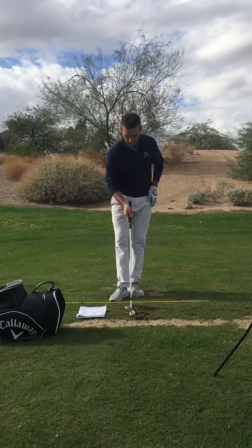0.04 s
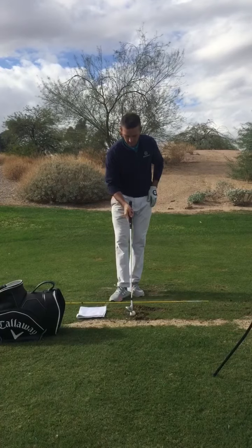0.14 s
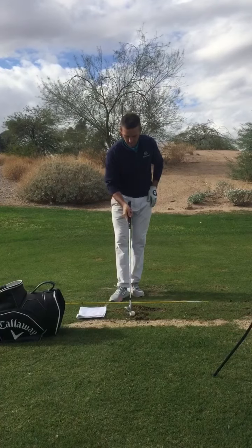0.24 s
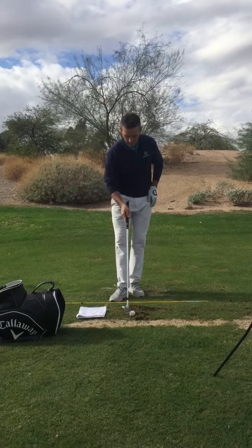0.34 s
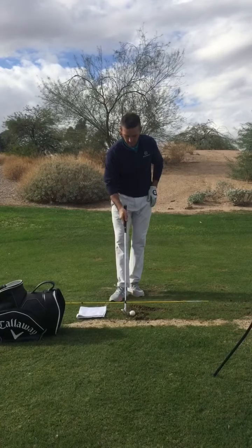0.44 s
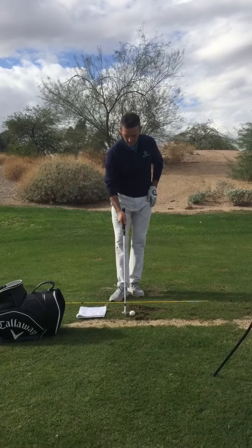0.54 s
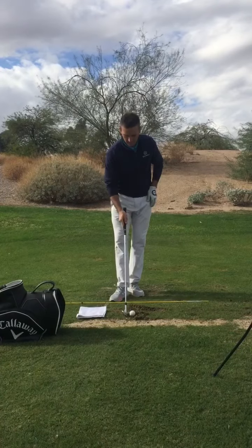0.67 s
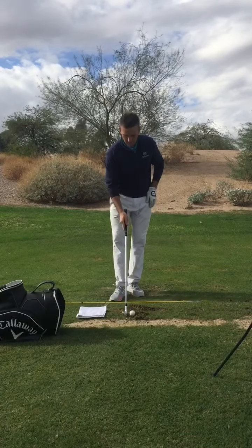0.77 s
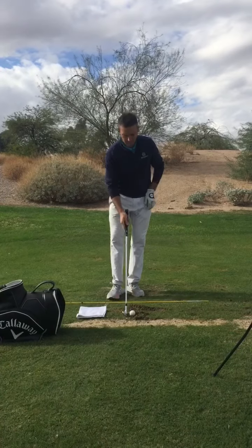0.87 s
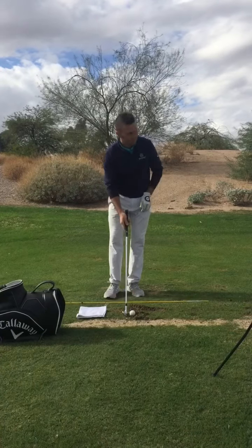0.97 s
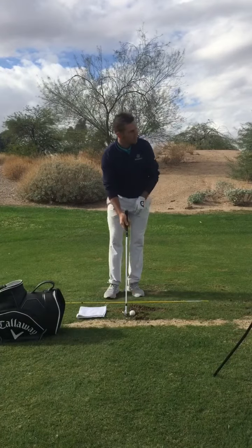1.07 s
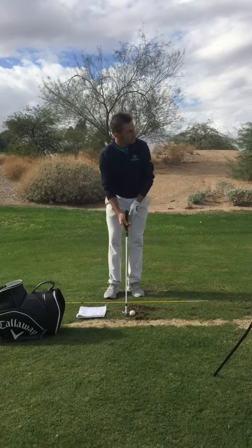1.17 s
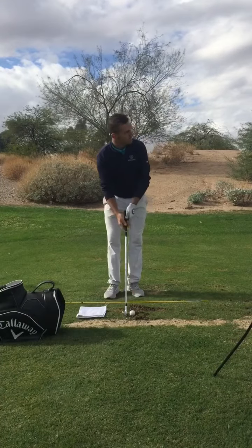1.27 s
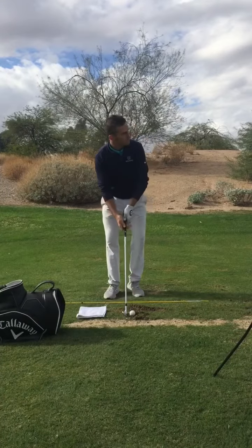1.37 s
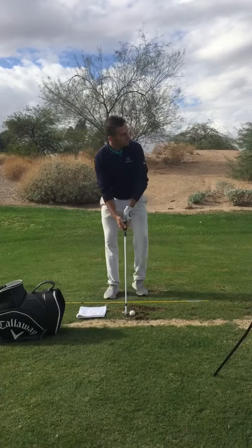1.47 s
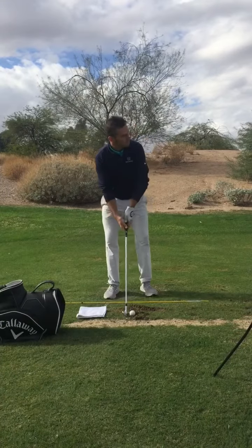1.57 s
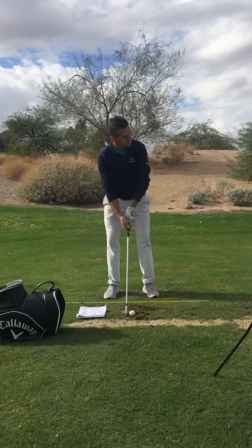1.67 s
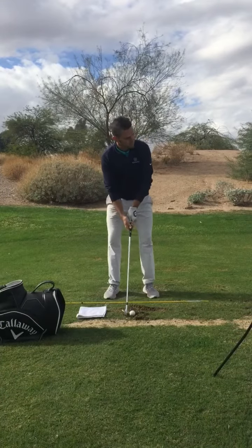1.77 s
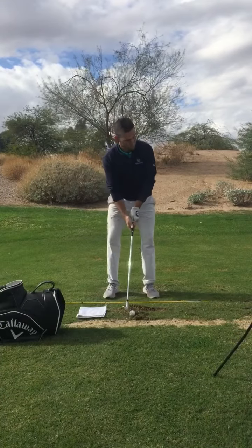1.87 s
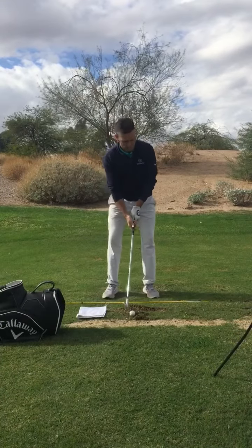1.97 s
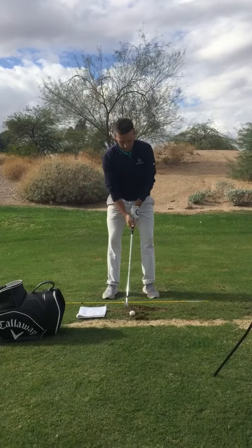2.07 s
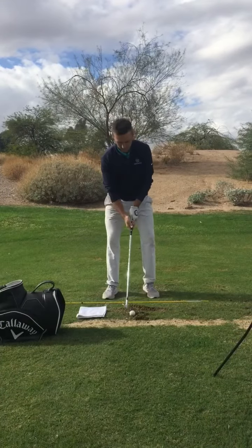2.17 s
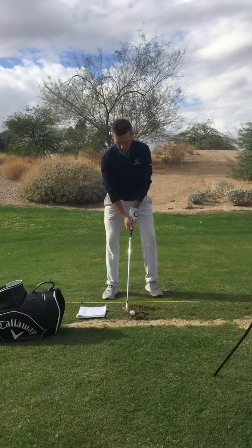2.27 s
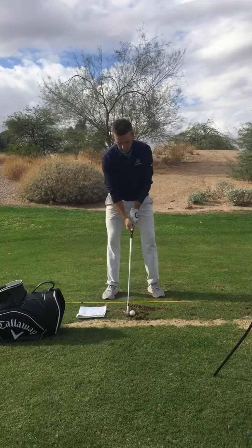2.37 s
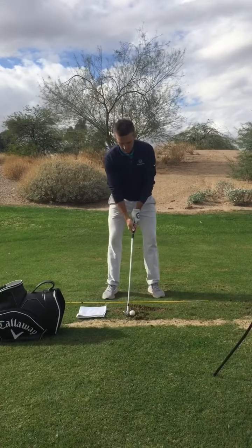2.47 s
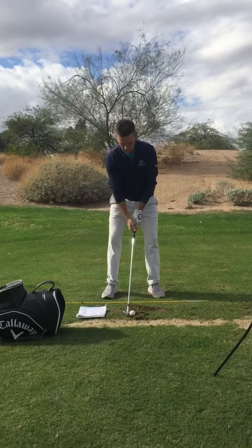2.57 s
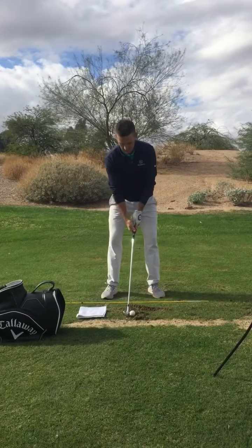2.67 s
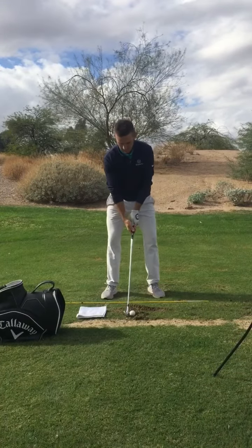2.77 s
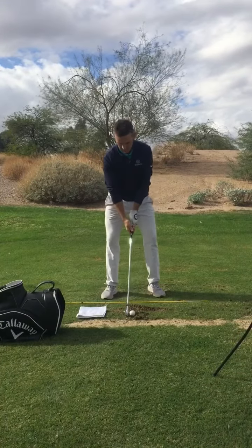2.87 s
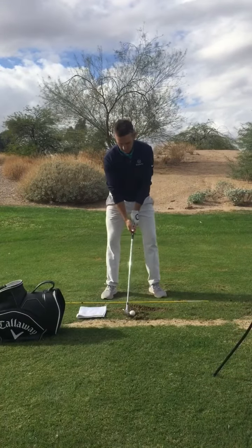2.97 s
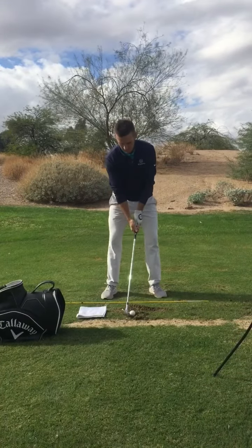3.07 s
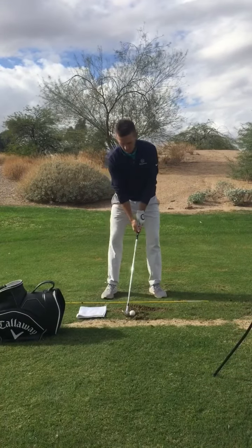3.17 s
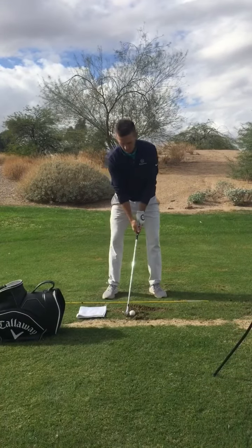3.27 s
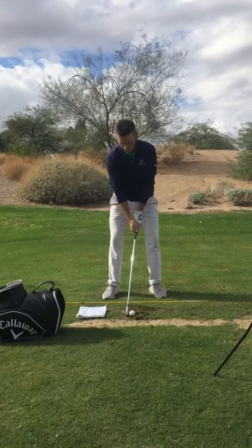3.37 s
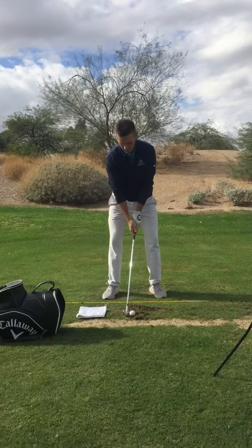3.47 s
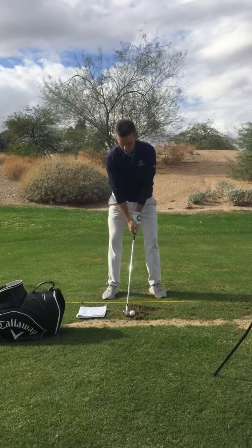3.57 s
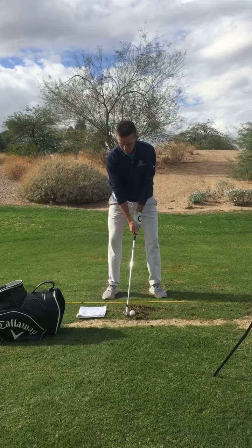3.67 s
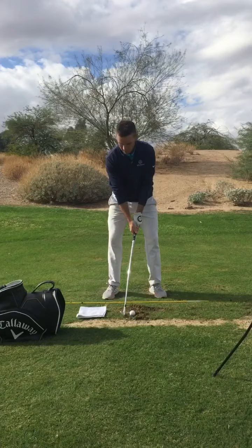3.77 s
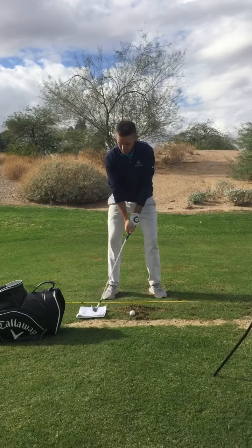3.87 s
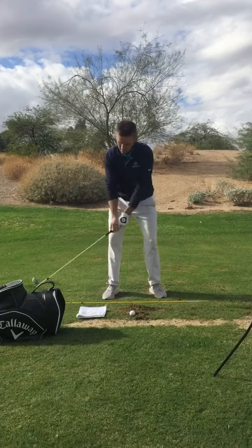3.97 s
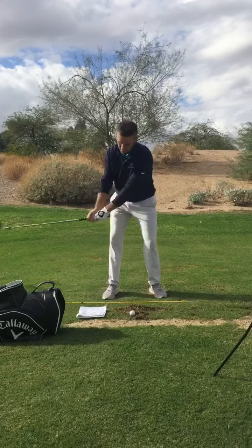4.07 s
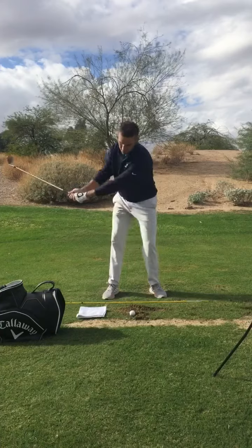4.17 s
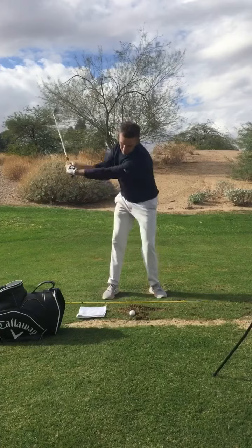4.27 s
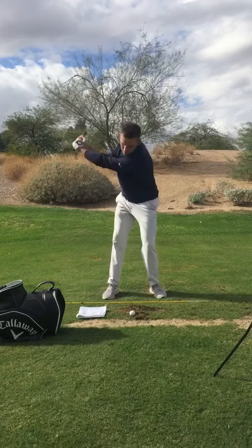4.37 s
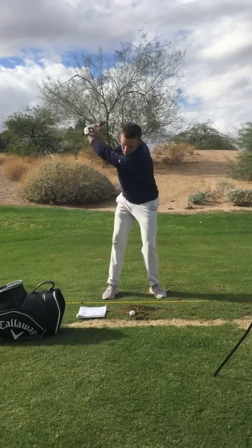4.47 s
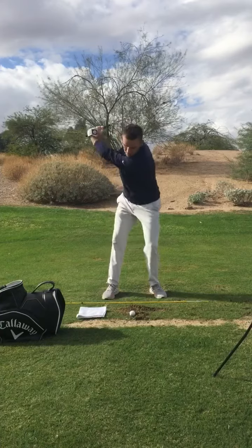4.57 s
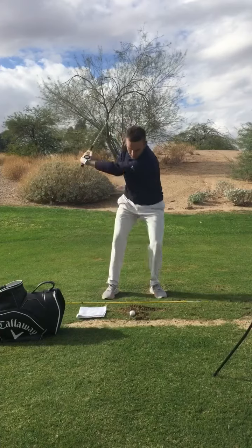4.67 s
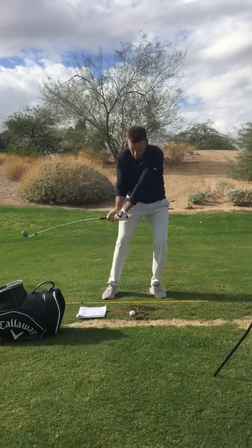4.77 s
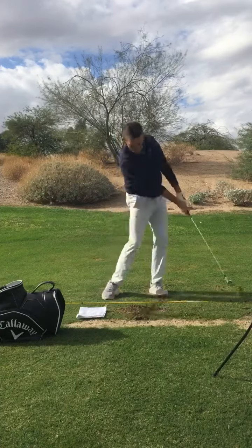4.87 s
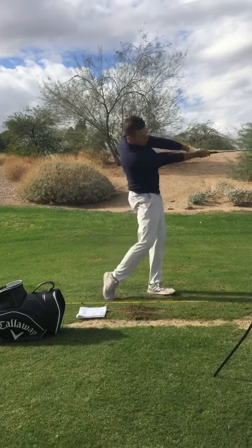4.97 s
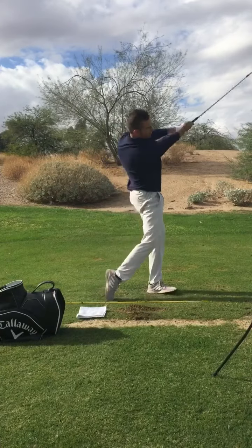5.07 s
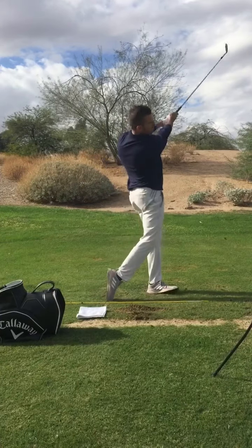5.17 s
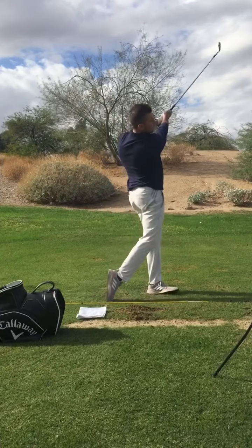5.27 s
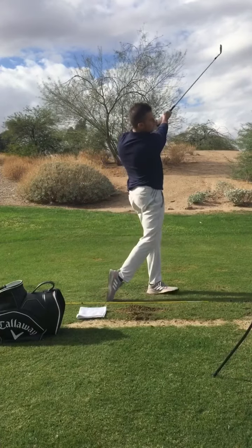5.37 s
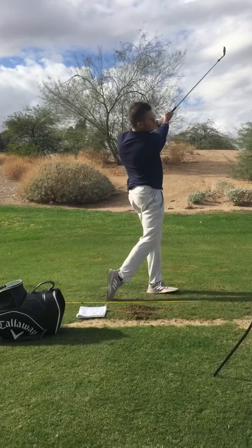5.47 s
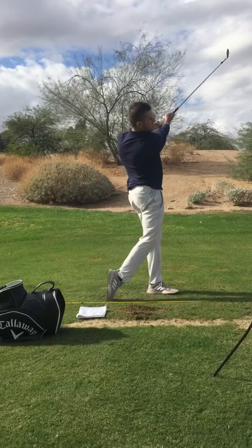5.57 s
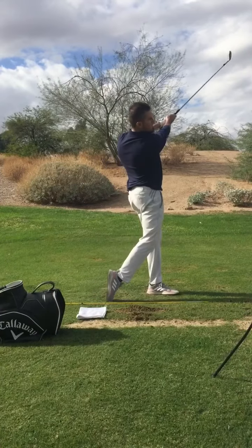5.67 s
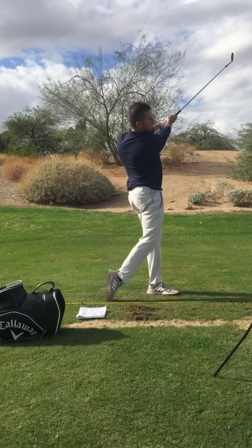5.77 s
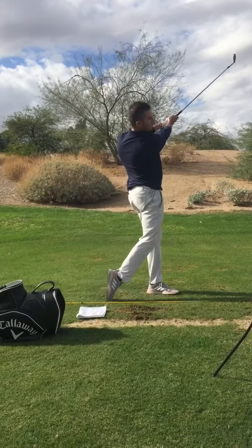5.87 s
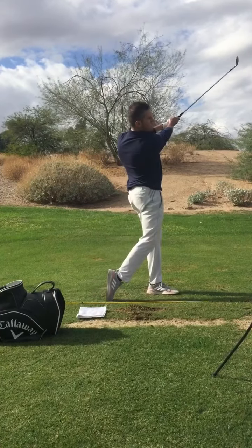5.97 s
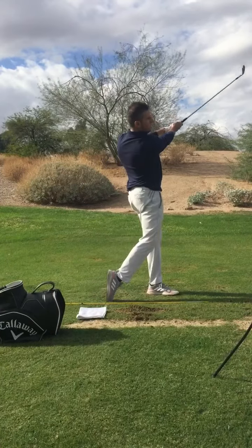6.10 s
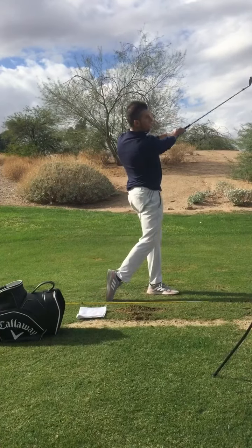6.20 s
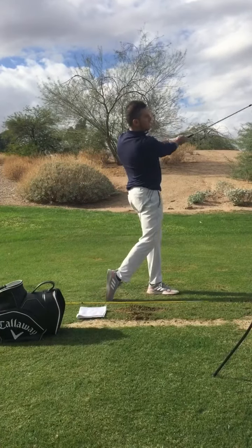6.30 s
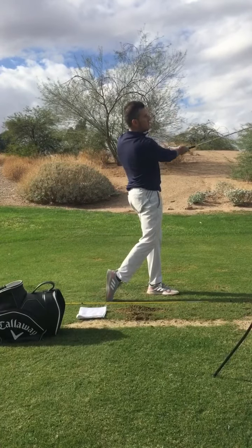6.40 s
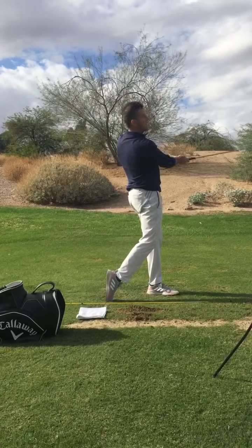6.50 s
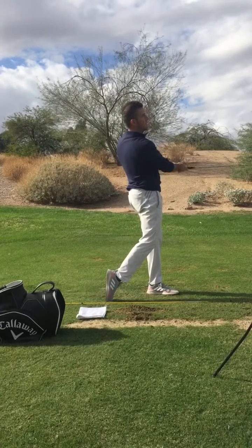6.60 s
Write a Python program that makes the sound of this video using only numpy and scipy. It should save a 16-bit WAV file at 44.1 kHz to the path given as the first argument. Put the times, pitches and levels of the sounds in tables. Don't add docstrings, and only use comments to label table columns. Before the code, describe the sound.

Outdoors in light wind and distant road roar, a golf iron swishes, clicks sharply on the ball and thuds into turf, scattering soil.

```python
import sys
import numpy as np
from scipy import signal
from scipy.fft import rfft, irfft
from scipy.io import wavfile

SR = 44100
rng = np.random.default_rng(int(sys.argv[2]) if len(sys.argv) > 2 else 0)


def gain_from_db(level_db):
    decades = np.asarray(level_db, float) / 20
    return 10 ** decades


def store_wav(level_fs):
    pcm = np.round(np.clip(np.atleast_2d(level_fs), -1, 1) * 32767)
    wavfile.write(sys.argv[1], SR, pcm.T.astype(np.int16))


N = 292824


def rms_one(x):
    return x / np.sqrt(np.mean(x ** 2) + 1e-20)


def in_time(rows):
    s, *columns = np.transpose(rows)
    return [np.interp(np.arange(N) / SR, s, c) for c in columns]


def drift(rate):
    step = 40
    r = np.exp(-2 * np.pi * rate * step / SR)
    noise = rng.standard_normal(N // step + 2002)
    slow = signal.lfilter([1], [1, -2 * r, r * r], noise)[2000:]
    return np.interp(np.arange(N) / step, np.arange(len(slow)), rms_one(slow))


def coloured(source, spectrum):
    hz, db = np.transpose(spectrum)
    bins_hz = np.fft.rfftfreq(N, 1 / SR) + 1
    gain = gain_from_db(np.interp(np.log(bins_hz), np.log(hz), db, left=-70, right=-70))
    return rms_one(irfft(rfft(source) * gain, N))


def band(x, low_hz, high_hz):
    sos = signal.butter(2, [low_hz, min(high_hz, .45 * SR)], "band", fs=SR, output="sos")
    return signal.sosfilt(sos, x)


def gate(start, length, edge):
    t = np.arange(N) / SR - start
    return np.clip(np.minimum(t, length - t) / edge, 0, 1) ** 2


def ring(clicks, modes):
    out = 0
    for hz, db, t60 in modes:
        r = gain_from_db(-60 / (t60 * SR))
        w = 2 * np.pi * hz / SR
        out = out + signal.lfilter([0, gain_from_db(db) * np.sin(w)], [1, -2 * r * np.cos(w), r * r], clicks + 1e-18)
    return out


def wind():
    # time in seconds, rumble level in dB.
    breeze = [(0.0, -52.5), (0.57, -50), (1.89, -55), (2.18, -52.5), (2.52, -53), (2.64, -50), (3.5, -49),
              (3.83, -52.5), (4.9, -47.5), (5.49, -51), (5.79, -51.5), (5.95, -48), (6.21, -49),
              (6.36, -46), (6.49, -47), (6.64, -49.5)]
    # frequency in Hz, level in dB per Hz.
    rumble = [(15, -51), (25, -22.5), (44, -2.5), (102, -2), (122, -1.5), (140, -6), (188, -10.5),
              (256, -22), (313, -33.5), (420, -26), (550, -56), (920, -120)]
    # time in seconds, peak in dB, frequency in Hz.
    puffs = [(1.307, -26, 95), (1.322, -26, 74), (2.05, -31, 114), (2.067, -29.5, 94), (2.083, -28.5, 81.5),
             (2.094, -20.5, 129), (2.177, -31.5, 113), (2.747, -28.5, 91), (2.77, -26, 82),
             (2.884, -32.5, 105), (2.923, -35, 90), (3.154, -34.5, 98), (3.415, -29.5, 72),
             (3.542, -32, 92), (5.775, -34.5, 92), (5.841, -31, 106.4), (5.925, -31.5, 89),
             (6.104, -33.5, 69), (6.131, -32.5, 92), (6.158, -29.5, 84), (6.2, -30.5, 59.9),
             (6.329, -33, 107), (6.351, -26, 220), (6.371, -26.5, 168), (6.391, -25, 133.3),
             (6.41, -22, 124), (6.432, -33, 154.5), (6.48, -29.5, 82), (6.513, -28.5, 132),
             (6.542, -32, 125)]
    rumble_db, = in_time(breeze)
    deep_db = -56.5 + 1.8 * (rumble_db - rumble_db.mean()) + 1.1 * drift(4.0)
    noise = coloured(rng.standard_normal(N), rumble)
    deep = rms_one(band(noise, 15, 75))
    upper = rms_one(band(noise, 75, 900))
    out = gain_from_db(2.1 * drift(12)) * (gain_from_db(rumble_db) * upper - gain_from_db(deep_db) * deep)
    for (s, db, hz), turn in zip(puffs, rng.random((len(puffs), 1))):
        half = int(2 * SR / hz)
        cycles = np.arange(-half, half) * hz / SR
        swing = np.exp(-(cycles / 0.54) ** 2) * np.cos(2 * np.pi * (cycles + 0.38 * (turn - .5)))
        start = round(s * SR) - len(cycles) // 2
        out[start:start + len(cycles)] += gain_from_db(db) * swing
    return out


def road():
    # time in seconds, roar level in dB.
    traffic = [(0.0, -52), (0.5, -54.5), (0.98, -52.5), (4.2, -53), (4.55, -51.5), (6.32, -51.5),
               (6.64, -52.5)]
    # frequency in Hz, level in dB per Hz.
    roar_colour = [(180, -42), (300, -14.5), (404, -16), (441, -12.5), (472, -4), (694, 1.5), (944, 2),
                   (1340, -4.5), (2040, -21.5), (3000, -35), (3900, -62), (6600, -120)]
    # frequency in Hz, level in dB per Hz.
    drone_colour = [(88, -37.5), (150, -5.5), (237, 1.5), (313, -13.5), (400, -11.5), (520, -40.5),
                    (880, -120)]
    roar = 0
    for centre_hz in (320, 450, 650, 900, 1250, 1800, 2600):
        part = band(coloured(rng.standard_normal(N), roar_colour), centre_hz / 1.2, centre_hz * 1.2)
        roar = roar + gain_from_db(1.6 * drift(8.4)) * part
    roar_db, = in_time(traffic)
    drone = gain_from_db(-63) * coloured(rng.standard_normal(N), drone_colour)
    return gain_from_db(roar_db) * rms_one(roar) + drone


def bird():
    # start in seconds, length in seconds, level in dB, low and high edge in Hz.
    hoarse = [
        (0.482, .04, -72, 4900, 6000),
        (.54, .28, -78.5, 4400, 4640),
        (.6, 0.25, -76, 2600, 4300),
    ]
    start_s, length_s, edge_s, level_db = .496, 0.061, .006, -62.5
    from_hz, to_hz, sag_s = 4560, 3750, .07
    t = np.maximum(np.arange(N) / SR - start_s, 0)
    hz = to_hz + (from_hz - to_hz) * np.exp(-t / sag_s)
    turns = np.cumsum(hz * (1 + .005 * drift(99))) / SR
    call = np.sqrt(2) * gain_from_db(level_db + 3.4 * drift(43)) * np.sin(2 * np.pi * turns)
    out = call * gate(start_s, length_s, edge_s)
    for s, length, db, low_hz, high_hz in hoarse:
        noise = rms_one(band(rng.standard_normal(N), low_hz, high_hz))
        out += gain_from_db(db) * noise * gate(s, length, 0.24 * length)
    return out


def pops():
    # time in seconds, peak in dB, width in seconds.
    breaks = [(1.306, -29, 0.0018), (2.049, -38, 0.0018), (2.095, -31, 0.0014), (6.352, -23.5, 0.00091),
              (6.384, -28.5, 0.00054), (6.39, -34, 0.00097), (6.397, -28.5, 0.0017), (6.41, -28.5, 0.0009),
              (6.431, -31, 0.0013), (6.507, -30, 0.0012)]
    out = np.zeros(N)
    for s, db, width in breaks:
        x = (np.arange(-400, 400) / SR / width) ** 2
        at = round(s * SR)
        out[at - 400:at + 400] += gain_from_db(db) * (1 - x) * np.exp(-x / 2)
    return out


def swish():
    fastest_s, top_m_per_s = 4.942, 35
    speed_up_s, slow_down_s = .075, 0.019
    shaft_m, strouhal = .012, .2
    blur_hz = 90
    t = np.arange(N) / SR - fastest_s
    pace = np.exp(np.minimum(t / speed_up_s, -t / slow_down_s))
    turns = 2 * np.pi * np.cumsum(strouhal * top_m_per_s * pace / shaft_m) / SR
    vortices = drift(blur_hz) * np.sin(turns) + drift(blur_hz) * np.cos(turns)
    tone = gain_from_db(-38.5) * pace ** 2.8 * vortices

    white = rng.standard_normal((2, N))
    top_hz = 200 * top_m_per_s * pace + 900
    rush = 0
    for k, hz in enumerate(700 * np.sqrt(2) ** np.arange(9)):
        tilt = (1000 / hz) ** .75
        rush = rush + tilt * band(white[k % 2], hz, hz * np.sqrt(2)) / (1 + (hz / top_hz) ** 3.5)
    rush_peak_s, rush_fade_s, rush_power = 4.924, 0.039, 2.8
    late = np.arange(N) / SR - rush_peak_s
    rush *= np.exp(np.minimum(rush_power * late / speed_up_s, -late / rush_fade_s))
    return tone + 5 * gain_from_db(-51) * rush


def thud():
    start_s, level_db, rise_s, t60_s = 4.9425, -22.5, 0.0036, 0.089
    from_hz, to_hz, sag_s = 716, 61.9, .012
    t = np.maximum(np.arange(N) / SR - start_s, 0)
    hz = to_hz + (from_hz - to_hz) * np.exp(-t / sag_s)
    shape = (1 - np.exp(-t / rise_s)) * gain_from_db(level_db - 60 * t / t60_s)
    return shape * np.sin(2 * np.pi * np.cumsum(hz * (t > 0)) / SR)


def blow():
    # time in seconds, level in dB on the face modes, on the head modes
    # and of the crack, crack t60 in seconds.
    contacts = [
        (4.945, -44, -37, -37, .03),
        (4.9475, -10.5, -24, -26, 0.0072),
        (4.948, -14.5, -20, -18.5, 0.0084),
        (4.9489, -25, -12.5, -26, .014),
        (4.9509, -19.5, -24, -26.5, .018),
    ]
    # frequency in Hz, level in dB, t60 in seconds.
    face_modes = [(2109, -5, .007), (2550, -2, 0.0061), (3130, -13.5, .007), (3880, -5.5, 0.011),
                  (4230, -4, .009), (4500, -5, .007), (5430, -15.5, .008), (7300, -15, .007),
                  (8800, -13.5, 0.013), (10960, -18.5, .006), (12600, -10.5, 0.0065), (14550, -15, .005)]
    # frequency in Hz, level in dB, t60 in seconds.
    head_modes = [(1138, 2, 0.013), (1549, -8.5, .012)]
    # delay in seconds, level in dB, low and high edge in Hz.
    echoes = [
        (0.018, -34.5, 1198, 6500),
        (.1825, -42.5, 2600, 7500),
    ]
    face, head, crack = np.zeros((3, N))
    since = np.arange(4000) / SR
    for s, face_db, head_db, crack_db, t60 in contacts:
        at = round(s * SR)
        face[at] = gain_from_db(face_db)
        head[at] = gain_from_db(head_db)
        crack[at:at + 4000] += gain_from_db(crack_db - 60 * since / t60)
    ringing = band(ring(head, head_modes), 860, 6000) - band(ring(face, face_modes), 1700, 17000)
    direct = ringing + crack * band(rng.standard_normal(N), 1800, 15000)
    out = direct.copy()
    for delay, db, low_hz, high_hz in echoes:
        out += gain_from_db(db) * np.roll(band(direct, low_hz, high_hz), round(delay * SR))
    return out


def spray():
    # frequency in Hz, level in dB per Hz.
    spray_colour = [(880, -30), (1500, 0), (1850, -6.5), (2510, -6), (4940, -15.5), (14300, -28.5),
                    (16100, -28.5)]
    # peak time in seconds, clods in dB, fine grit in dB,
    # fading time in seconds.
    handfuls = [
        (4.955, -50, -60, 0.0075),
        (5.01, -64, -61, .07),
        (5.004, -72, -59, 0.014),
        (5.042, -59, -65.5, 0.0178),
        (5.12, -71, -71, .025),
        (5.24, -72, -79, .03),
    ]
    sizes = gain_from_db(2.8 * np.minimum(rng.exponential(1, N), 5)) * rng.choice([-1, 1], N)
    landed = rng.random(N) < 20000 / SR
    patter = coloured(sizes * landed, spray_colour)
    clods = rms_one(band(patter, 1500, 4000))
    grit = rms_one(band(patter, 2800, 18000))
    out = 0
    for s, clods_db, grit_db, fade in handfuls:
        t = (np.arange(N) / SR - s) / fade
        swell = np.exp(np.minimum(t / .8, -t))
        out = out + swell * (gain_from_db(clods_db) * clods + gain_from_db(grit_db) * grit)
    return out


def scene():
    air = wind() + pops() + road()
    club = swish() + thud() + blow() + spray()
    return (air + club + bird())[None]


def top_cut(x):
    return signal.sosfilt(signal.butter(12, 16250, fs=SR, output="sos"), x)


def record(dry):
    # frequency in Hz, level in dB per Hz.
    hiss_colour = [(1470, -26), (2500, -3), (4090, -3.5), (4920, -7.5), (5430, -5.5), (6440, -6),
                   (7560, -9.5), (9600, -8.5), (10400, -13), (12000, -11), (15700, -14)]
    hiss = gain_from_db(-76) * coloured(rng.standard_normal(N), hiss_colour)
    thin = signal.sosfilt(signal.butter(3, 39, "high", fs=SR, output="sos"), dry)
    cut = signal.sosfilt(signal.cheby2(16, 80, 16600, fs=SR, output="sos"), thin + hiss)
    return top_cut(cut)


dry = scene()
out = record(dry)
store_wav(out)
```